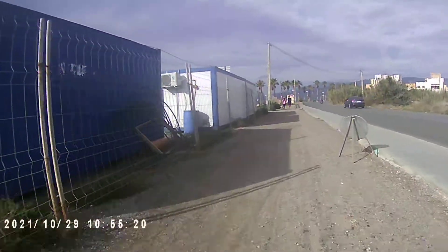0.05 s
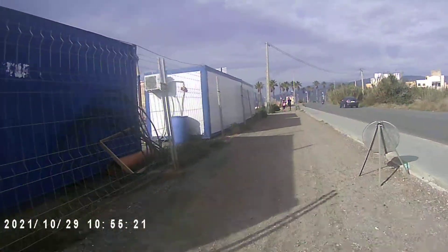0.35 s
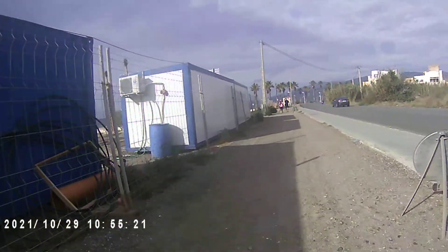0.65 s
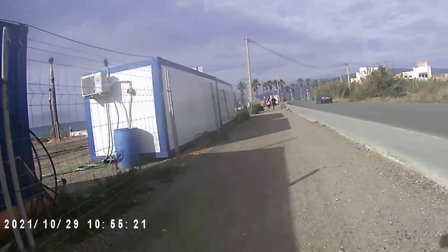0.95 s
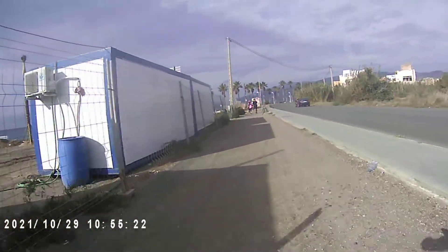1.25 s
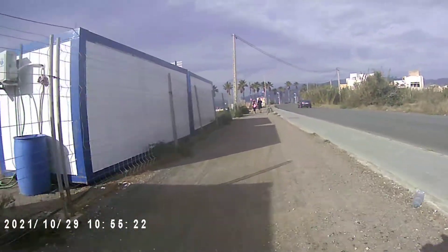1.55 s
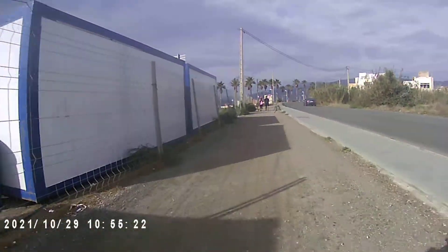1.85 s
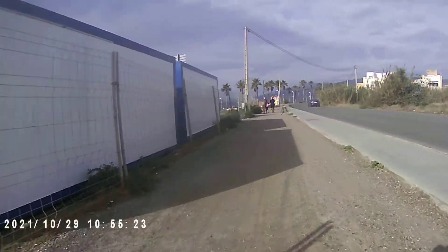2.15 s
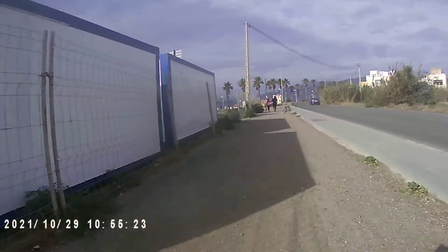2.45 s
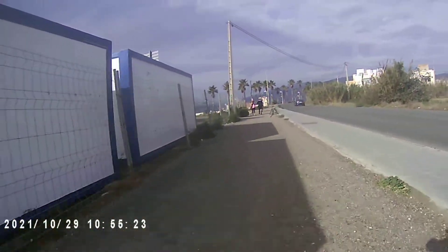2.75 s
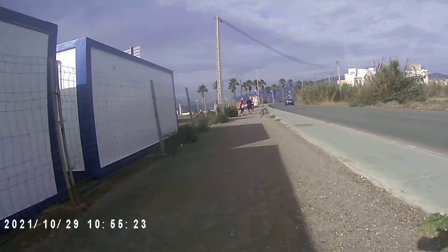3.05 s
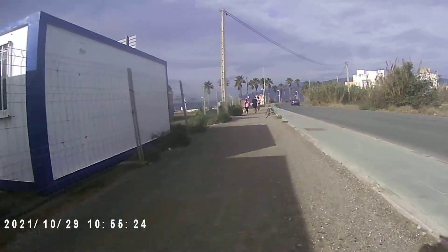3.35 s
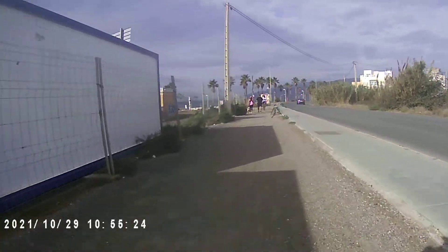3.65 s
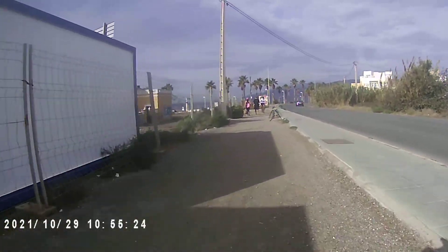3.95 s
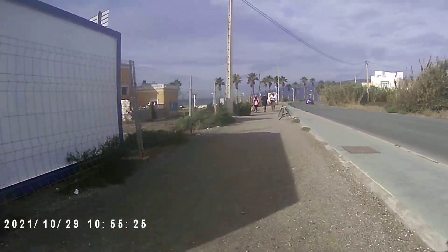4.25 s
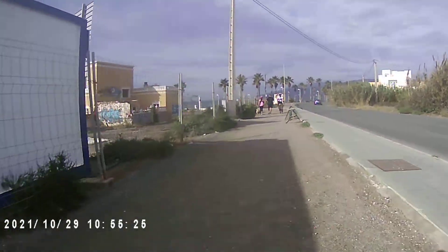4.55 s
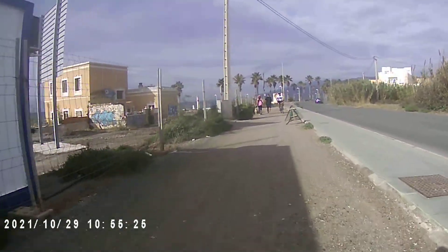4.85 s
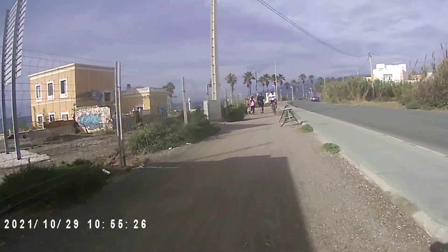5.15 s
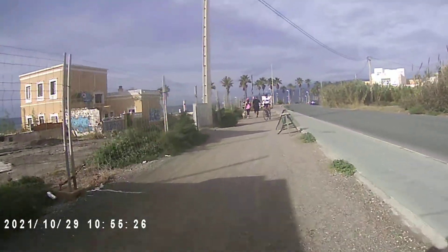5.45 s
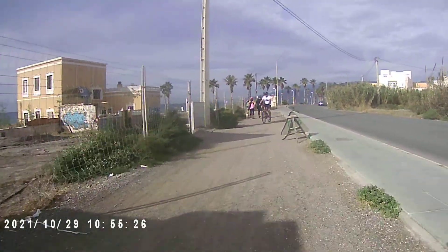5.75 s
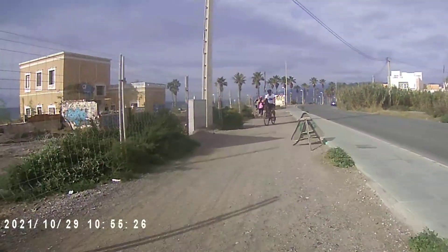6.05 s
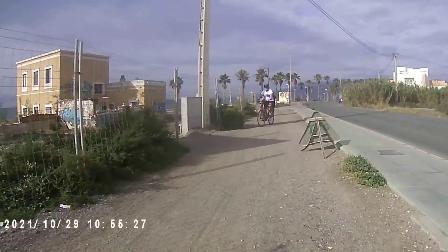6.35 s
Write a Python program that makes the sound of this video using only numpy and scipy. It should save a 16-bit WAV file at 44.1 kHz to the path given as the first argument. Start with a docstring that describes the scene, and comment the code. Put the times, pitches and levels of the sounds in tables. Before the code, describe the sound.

A bicycle rolls along a gravel path in the open air, heard close up from a microphone fixed to it. In the first half second a strong gust buffets and overloads the microphone; the wind then keeps rumbling and roaring in uneven swells. Grit crunches under the tyres throughout, and the shaken mount drones low and ticks faintly. From about 0.6 seconds stones pop out from under the tyres with dull ticks, and from 0.8 seconds bumps make the plastic mount clack irregularly with small hollow thuds. The jolted bell gives short, damped chinks now and then, loudest near 2 seconds, with a small cluster between 4 and 5 seconds. The biggest stones pop around 4 seconds. The hardest clacks come at about 5 to 6 seconds, when the wind has eased, and the ride carries on until the end at about 6.5 seconds.

```python
"""A bicycle rolls along a gravel path, heard from a camera fixed to it.
It opens with a strong gust that buffets and overloads the microphone; grit crunches under the tyres
and the shaken mount drones low. Within a second, stones pop and bumps start to make the mount clack.
The jolted bell chinks now and then, loudest near 2 s. The biggest stones pop around 4 s,
and the hardest clacks come at about 5 to 6 s, when the wind has eased."""
import sys
import numpy as np
from scipy import signal
from scipy.fft import rfft, irfft
from scipy.io import wavfile
from scipy.ndimage import uniform_filter1d

SR = 44100
rng = np.random.default_rng(int(sys.argv[2]) if len(sys.argv) > 2 else 0)


def pcm_store(signal):
    """Save signal as 16-bit PCM."""
    levels = np.round(np.clip(np.atleast_2d(signal), -1, 1) * 32767)
    wavfile.write(sys.argv[1], SR, levels.astype(np.int16).T)


N = 287532

# Tone of grit cracking under the tyres: f/Hz, level/dB
CRUNCH_TONE = [(600, -34), (1300, 2.5), (1900, 6), (2250, 6), (2550, -0.5), (3000, 2), (3600, -4.5),
               (4100, -2.5), (4800, -16), (5800, -30), (7300, -38.5), (10000, -47)]
# Tone of tyres rolling on sand: f/Hz, level/dB
SAND_TONE = [(3000, 2.5), (5300, -4), (5900, -5.5), (6700, 1), (7400, 0.5), (8200, -12.5), (10000, -16.5),
             (15000, -15)]
# Tone of a popping stone: f/Hz, level/dB
POP_TONE = [(500, -14), (1400, -12.5), (2000, 0), (2550, -5), (3050, -3.5), (3800, -14), (5000, -35),
            (7000, -35), (10000, -54)]
# Tone of the mount's plastic hitting its stop: f/Hz, level/dB
CLACK_TONE = [(500, 13.5), (1500, -4), (2900, 5.5), (3300, 3), (3650, 4), (3900, -3.5), (4400, 3),
              (5650, -15), (7200, -1.5), (7650, -7), (8200, -5), (9150, -10.5), (9800, -25.5),
              (12500, -30.5), (16000, -46.5)]
# Tone of large eddies (swirls of air): f/Hz, level/dB
BUFFET_TONE = [(8, -11), (20, -2), (45, 0), (62, -2.5), (85, -8), (115, -8.5), (170, -19.5), (300, -27.5),
               (600, -87)]
# Tone of small eddies: f/Hz, level/dB
ROAR_TONE = [(50, -18), (120, 2), (210, 3), (320, 0.5), (480, -2), (700, 0.5), (800, -3.5), (950, -10),
             (1200, -20), (1700, -43.5), (3000, -36.5), (6000, -70), (15000, -83)]
# Tone of the finest eddies: f/Hz, level/dB
TEARING_TONE = [(400, -20.5), (900, -5), (1300, 6), (2000, 2), (3000, -19.5), (5000, -23), (9000, -38.5),
                (15000, -61)]
# The damped bell's notes: f/Hz, level/dB, time to fade by 60 dB/s
BELL_NOTES = [(4250, 2.5, 0.03), (5270, -4, 0.031), (6000, -11, .02), (6480, -1.5, 0.028),
              (7100, -3.5, 0.045), (7300, -5.5, 0.03), (7560, -10, 0.021), (8250, -18, .02)]
# Roughness of the path: t/s, mount shake level/dB, tyre crunch level/dB
ROUGHNESS = [(0, -9, -36.5), (.48, -9.5, -43), (1.05, -14, -38), (1.45, -11, -41.5), (1.9, -15.5, -40),
             (2.4, -7.5, -41), (2.53, -17.5, -41), (2.8, -20, -43), (3.15, -16.5, -42), (3.38, -12, -43),
             (4.17, -12, -41.5), (4.35, -21, -48.5), (4.47, -9.5, -42), (4.62, -22, -43), (4.8, -14, -41),
             (5.55, -13, -41), (5.76, -17.5, -44), (5.87, -15, -40.5), (6.1, -8, -37), (6.52, -11, -41)]
# Large stones pop from under a tyre: t/s, level/dB
LARGE_STONES = [(0.5892, -23), (1.124, -20.5), (1.2895, -16.5), (1.3118, -16.5), (1.7546, -21.5),
                (1.8372, -21.5), (2.0663, -16), (2.477, -19), (2.495, -21), (2.6008, -20.5), (3.144, -27),
                (3.272, -22), (3.3238, -20.5), (3.6864, -22), (3.883, -14.5), (4.087, -13), (4.1126, -21),
                (4.23, -14.5)]
# The bell is jolted: t/s, level/dB
BELL_JOLTS = [(0.6908, -35.5), (1.6777, -36), (2.109, -25), (2.3062, -39), (2.7656, -37.5), (3.465, -38),
              (4.1794, -33.5), (4.2562, -35), (4.6894, -37), (4.783, -39), (4.826, -31), (4.919, -33),
              (4.9316, -35), (5.999, -35)]
# The mount clacks on bumps: t/s, clack level/dB, hollow housing knock level/dB
BUMPS = [(0.8, -19.5, -7), (0.81, -21.5, -18), (1.29, -26.5, -5), (1.6204, -28.5, -21),
         (1.7685, -19.5, -11), (1.8788, -18.5, -31), (2.072, -30, -15.5), (2.1093, -22, -11),
         (2.2577, -25, -30), (2.2787, -22.5, -11), (2.375, -20.5, -8), (2.6691, -22, -9),
         (3.021, -28.5, -15), (3.1994, -28, -28), (3.242, -30, -23), (3.407, -22.5, -21),
         (3.7869, -23.5, -15), (3.807, -37, -13.5), (4.2312, -30, -13), (4.2866, -25, -17),
         (4.3905, -31, -12.5), (4.4932, -27.5, -19), (4.5418, -27, -31), (4.6756, -25, -16),
         (4.9564, -15.5, -11.5), (5.028, -26.5, -34), (5.1838, -25, -16), (5.2759, -18.5, -13.5),
         (5.2872, -18, -12.5), (5.4156, -17.5, -14), (5.547, -16.5, -15.5), (5.9329, -17, -17.5),
         (5.9714, -17.5, -12), (6.0608, -16.5, -11), (6.187, -24.5, -34), (6.2052, -19, -21),
         (6.3005, -25, -16), (6.413, -28.5, -16)]
# The headwind swells and eases: t/s, buffeting level/dB, roar level/dB
GUSTS = [(0, -26, -16.5), (.1, -6, -12.5), (.3, -7.5, -13.5), (.48, -17.5, -14), (1.12, -17.5, -19),
         (1.32, -9, -16.5), (1.54, -12, -14.5), (1.68, -12, -20.5), (2.02, -15.5, -21), (2.33, -10, -20),
         (2.53, -12, -25), (2.72, -16, -20.5), (3.08, -19.5, -26.5), (3.28, -16, -21), (3.68, -13.5, -17.5),
         (4.0, -18, -18.5), (4.24, -11, -19), (4.5, -14, -18), (4.73, -17.5, -24), (5.03, -18.5, -20),
         (5.48, -20.5, -22), (5.97, -15, -20), (6.52, -17.5, -22)]
# Single eddies burst on the microphone opening: t/s, level/dB, rise time/s
EDDY_BURSTS = [(0.143, -16, 0.0033), (.21, -6, 0.0025), (.264, -6, 0.0075), (.3, -8, 0.0019),
               (0.871, -8.5, 0.0024), (1.305, -8.5, 0.0078), (1.471, -14, 0.019), (2.102, -8, 0.0026),
               (2.187, -14, 0.0026), (2.551, -8, 0.0025), (2.633, -14, 0.0052), (2.695, -10.5, .007),
               (3.6, -17, 0.019), (4.121, -11, 0.0012), (4.189, -12, 0.0035), (4.28, -14.5, 0.014),
               (5.035, -19, 0.011), (5.102, -18.5, 0.0025), (5.661, -16, 0.0027), (5.74, -13.5, 0.022)]


def gain_of(db):
    """Turns decibels into a number to multiply a sound by."""
    return 10 ** (np.asarray(db) / 20)


def evened(x):
    """Scales a signal so that its average (rms) level is 1."""
    return x / np.sqrt(np.mean(x ** 2) + 1e-20)


def steadied(x, size):
    """Holds the level of a noise near 1 over spans of size samples."""
    power = uniform_filter1d(uniform_filter1d(x ** 2, size), size)
    return x / np.sqrt(abs(power) + 1e-20)


def add(mix, s, sound):
    """Mixes a sound in at s seconds."""
    part = mix[max(round(s * SR), 0):][:len(sound)]
    part += sound[:len(part)]


def coloured(x, tone, size=8192):
    """Filters a sound by a tone table."""
    hz, db = np.transpose(tone)
    log_hz = np.log(abs(np.fft.fftfreq(size, 1 / SR)) + 1)
    log_gain = np.log(gain_of(np.interp(log_hz, np.log(hz), db)))
    response = np.exp(np.conj(signal.hilbert(log_gain)))  # rings after a hit, never before
    taps = np.fft.ifft(response).real[:size // 2]
    return signal.fftconvolve(x, taps)[:len(x)]


def drift(rate_hz):
    """Random wandering of average size 1, up to about the given rate."""
    hz = np.fft.rfftfreq(N, 1 / SR)
    return evened(irfft(rfft(rng.standard_normal(N)) / (1 + (hz / rate_hz) ** 4), N))


def curve(rows, column):
    """Turns one dB column of a time table into a gain for every sample."""
    rows = np.array(rows)
    return gain_of(np.interp(np.arange(N) / SR, rows[:, 0], rows[:, column]))


def scattered(count, db, spread_db):
    """Events at random moments, from db upwards, the louder ones rarer: t/s, level/dB."""
    when, size = rng.random((count, 2)).T
    return list(zip(when * N / SR, db + spread_db * np.minimum(-np.log(1 - size), 3)))


def knock(tone, scrape_s, scrape_db, tail_s, tail_db, size=2200):
    """One contact with energy 1: a gritty scrape that peaks in a hard blow, then a faint tail."""
    t = np.arange(size) / SR
    swell = t / scrape_s * np.exp(1 - t / scrape_s)
    tail = gain_of(tail_db) * np.exp(-t / tail_s)
    grit = rng.choice([-1, 1], size) * (swell + tail)
    blow = np.sinc((t - scrape_s) * SR)
    sound = coloured(blow + gain_of(scrape_db) * grit / np.linalg.norm(grit), tone)
    return sound / np.linalg.norm(sound)


def tyres(grains_per_s=600, spread_db=4.5, grain_s=0.00083, shapes=24,
          wash_db=-3, crunch_db=1, hiss_db=-17, patch_hz=7, patch_db=1.2):
    """Patches of grit crack under the tyres, over the wash and fine hiss of rolling on sand."""
    t, grains = np.arange(400) / SR, np.zeros(N)
    for shape in rng.standard_normal((shapes, len(t))) * np.exp(-t / grain_s):
        sizes = gain_of(spread_db * np.minimum(rng.exponential(1, N), 4))
        cracks = rng.random(N) < grains_per_s / shapes / SR
        grains += signal.oaconvolve(sizes * cracks, shape)[:N]
    wash = gain_of(wash_db) * rng.standard_normal(N)
    crunch = evened(coloured(evened(grains) + wash, CRUNCH_TONE))
    hiss = gain_of(hiss_db) * evened(coloured(rng.standard_normal(N), SAND_TONE))
    patches = gain_of(crunch_db + patch_db * drift(patch_hz))
    return patches * curve(ROUGHNESS, column=2) * (crunch + hiss)


def stone_pops(pop_db=15, lag_s=.0006):
    """Stones snap out from under the rubber with a dull tick: a few large ones among many small."""
    out = np.zeros(N)
    for s, db in LARGE_STONES + scattered(count=50, db=-27, spread_db=2.9):
        pop = knock(POP_TONE, scrape_s=0.000706, scrape_db=-0.5, tail_s=0.015, tail_db=-4)
        add(out, s + lag_s, gain_of(db + pop_db) * pop)
    return out


def bell(bell_db=-10, bounce_s=0.0027, bounce_db=-4, uneven_db=3, touches=5):
    """The striker bounces on the dome at jolts, and faintly between them, weaker with each touch."""
    out, t = np.zeros(N), np.arange(SR // 16) / SR
    hz, note_db, fade_s = np.transpose(BELL_NOTES)[:, :, None]
    fade = np.exp(-np.log(1000) * t / fade_s)
    onset = 1 - np.exp(-t / .0003)
    for s, db in BELL_JOLTS + scattered(count=12, db=-43, spread_db=1.8):
        for touch in range(touches):
            phase = rng.random(hz.shape)
            spot = rng.uniform(-1.6, 2.9, hz.shape)  # each spot on the dome favours other notes
            notes = gain_of(note_db + uneven_db * spot) * fade * np.sin(2 * np.pi * (hz * t + phase))
            when = s + bounce_s * (touch + .5 * rng.random())
            add(out, when, gain_of(db + bell_db + touch * bounce_db) * notes.sum(0) * onset)
    return out


def mount_chatter(shake_power=0.33):
    """The slightly loose mount keeps ticking faintly, louder where the path is rough."""
    out = np.zeros(N)
    for s, db in scattered(count=130, db=-24, spread_db=5):
        tick = knock(CLACK_TONE, scrape_s=0.0012, scrape_db=5, tail_s=.005, tail_db=-18)
        add(out, s, gain_of(db) * tick)
    return out * curve(ROUGHNESS, column=1) ** shake_power


def jolts(half_crossing_s=0.03, clack_power=0.41):
    """How hard the bicycle is jolted, 0 to 1: a short swell as a wheel crosses each bump."""
    t, jolt = np.arange(N) / SR, np.zeros(N)
    for s, db, _ in BUMPS:
        swell = gain_of(db * clack_power) / (1 + ((t - s) / half_crossing_s) ** 2)
        jolt = np.maximum(jolt, swell)
    return jolt / jolt.max()


def mount_drone(hz=75, width_hz=8, drone_db=-1.8, rut_hz=7, rut_db=2.5, jolt_db=1.5, rumble_db=-22):
    """Rough ground shakes the mount at its own low note; bumps add to it and make the housing rumble."""
    f, jolt = np.fft.rfftfreq(N, 1 / SR), jolts()
    shake = irfft(rfft(rng.standard_normal(N)) / (1 + 1j * (f - hz) / width_hz) ** 2, N)
    level = curve(ROUGHNESS, column=1) * gain_of(drone_db + rut_db * drift(rut_hz) + jolt_db * jolt)
    rumble = evened(coloured(rng.standard_normal(N), ROAR_TONE))
    return level * steadied(shake, size=3000) + gain_of(rumble_db) * jolt * rumble


def mount_clacks(clack_db=20, thud_db=9, thud_hz=85, thud_s=0.016,
                 housing_db=6, housing_hz=670, housing_s=0.0022, lag_s=.0004, size=2200):
    """Hard plastic hits its stop; the hollow housing knocks and the jolted camera gives a short thud."""
    out, t = np.zeros(N), np.arange(size) / SR
    thud = -gain_of(thud_db) * np.sin(2 * np.pi * thud_hz * t) * np.exp(-t / thud_s)
    for s, db, hollow_db in BUMPS:
        clack = knock(CLACK_TONE, scrape_s=0.000594, scrape_db=4, tail_s=0.005, tail_db=-14, size=size)
        hit = gain_of(db) * (gain_of(clack_db) * clack + thud)
        hz = housing_hz * rng.uniform(0.87, 1.08)
        housing = np.sin(2 * np.pi * hz * t) * np.exp(-t / housing_s)
        add(out, s + lag_s, hit + gain_of(hollow_db + housing_db) * housing)
    return out


def wind_bursts(burst_db=-1):
    """Single strong eddies hit the microphone: puffs of roar that rise quickly and die away."""
    puffs, t = np.zeros(N), np.arange(SR // 4) / SR
    roar = steadied(coloured(rng.standard_normal(N), ROAR_TONE), size=300)
    for s, db, rise_s in EDDY_BURSTS:
        add(puffs, s, gain_of(db + burst_db) * t / rise_s * np.exp(1 - t / rise_s))
    return puffs * roar


def wind(buffet_db=0.5, roar_db=-1, eddy_hz=45, eddy_db=2, tearing_db=-5, tearing_power=2.21,
         gust_hz=8, buffet_gust_db=2, roar_gust_db=0.98):
    """In gusts, large eddies push on the microphone and small ones roar at its opening in flurries."""
    buffet = steadied(coloured(rng.standard_normal(N), BUFFET_TONE), size=3000)
    push = curve(GUSTS, column=1) * gain_of(buffet_gust_db * drift(gust_hz))
    strength = curve(GUSTS, column=2) * gain_of(roar_gust_db * drift(gust_hz))
    flurries = gain_of(eddy_db * drift(eddy_hz))
    roar = strength * steadied(coloured(rng.standard_normal(N) * flurries, ROAR_TONE), size=2200)
    fine_eddies = evened(coloured(rng.standard_normal(N) * flurries ** 2, TEARING_TONE))
    tearing = strength ** tearing_power * fine_eddies  # outgrows the roar: strong gusts sound brighter
    return gain_of(buffet_db) * push * buffet + gain_of(roar_db) * roar + gain_of(tearing_db) * tearing


def scene():
    """Everything reaches the one microphone directly, in the open air."""
    rolling = wind() + wind_bursts() + mount_drone() + tyres()
    return (rolling + mount_clacks() + stone_pops() + bell() + mount_chatter())[None]


def record(dry, drive_db=1.5, ceiling=.705, cutoff_hz=15500):
    """Strong gusts overload the microphone and are cut flat; then the highest treble is removed."""
    clipped = np.clip(dry * gain_of(drive_db), -ceiling, ceiling)
    low_pass = signal.firwin(255, cutoff_hz, window=("kaiser", 9), fs=SR)
    return signal.oaconvolve(clipped, low_pass[None], "same")


dry = scene()
out = record(dry)
pcm_store(out)
```